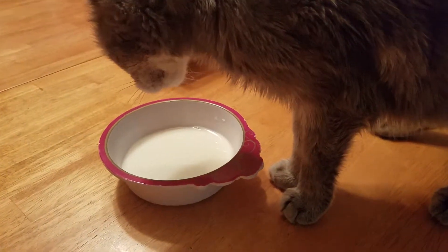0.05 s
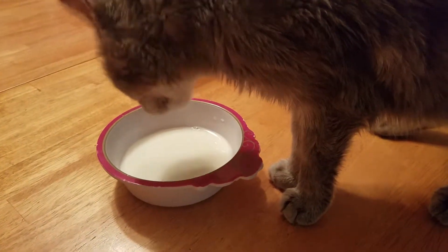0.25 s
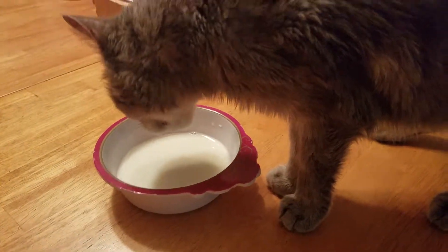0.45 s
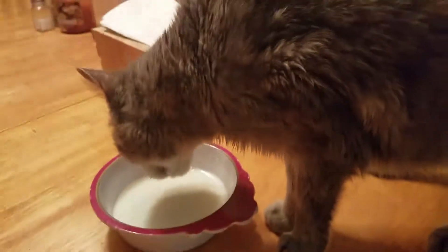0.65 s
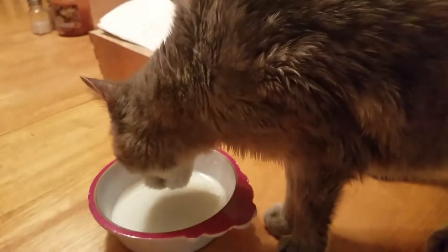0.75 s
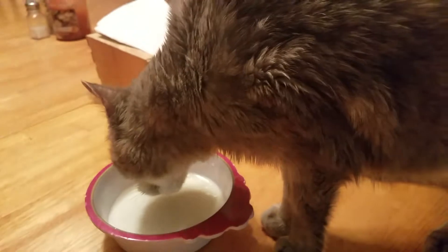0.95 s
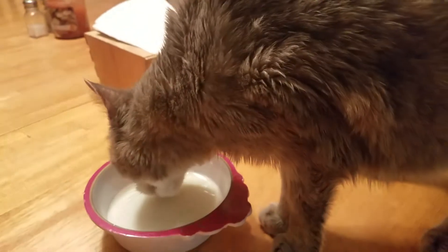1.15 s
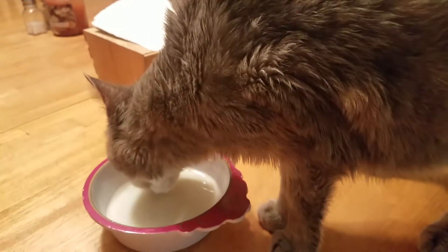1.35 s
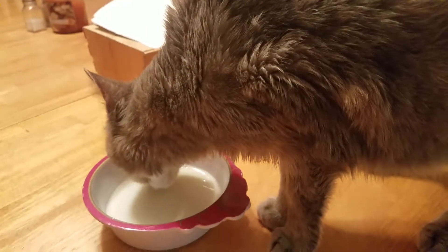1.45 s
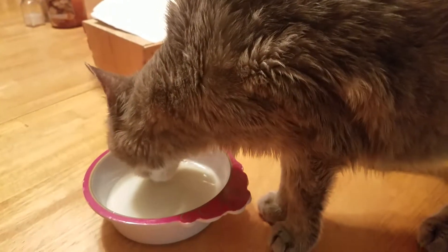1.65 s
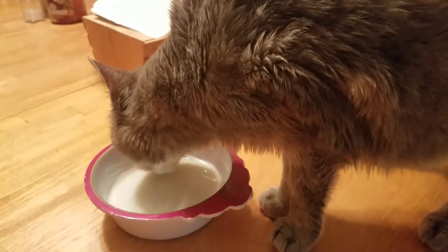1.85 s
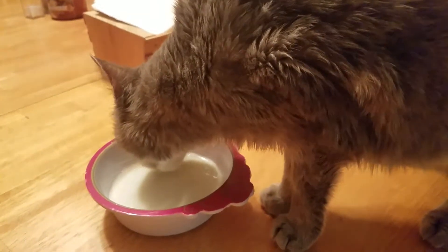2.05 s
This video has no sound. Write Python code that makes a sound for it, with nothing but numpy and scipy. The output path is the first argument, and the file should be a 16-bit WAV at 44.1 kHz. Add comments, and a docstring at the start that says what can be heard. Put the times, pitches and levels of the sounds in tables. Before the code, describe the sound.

Soft, wet lapping of a cat drinking milk, after a few dull microphone bumps.

```python
"""A cat laps milk from a bowl in a quiet room: soft, wet tongue smacks that ring briefly in its mouth,
a few tiny ticks, and one short snuffle as air flutters through its nose. Mostly before the lapping,
the hand holding the recorder shifts, sending dull bumps and a little rubbing to the left microphone.
Underneath lies a bed of steady room tone, a faint ringing whir and microphone hiss."""
import sys
import numpy as np
from scipy import signal
from scipy.fft import rfft, irfft
from scipy.io import wavfile
from scipy.ndimage import uniform_filter1d

SR = 44100
rng = np.random.default_rng(int(sys.argv[2]) if len(sys.argv) > 2 else 0)


def unload_audio(sound):
    """Save the sound as a 16-bit wav file, at the path given as the first command line argument."""
    columns = np.transpose(np.atleast_2d(sound))
    # keep every value between -1 and 1, then stretch to whole-number steps
    steps = np.round(np.clip(columns, -1, 1) * 32767)
    wavfile.write(sys.argv[1], SR, steps.astype(np.int16))


N = 92610
TIME = np.arange(N) / SR


def from_db(db):
    """Decibels to gain."""
    return 10 ** (np.asarray(db) / 20)


def unit_rms(x):
    """Scale to unit power."""
    return x / np.sqrt(np.mean(x ** 2) + 1e-20)


def fader(rows):
    """A gain curve from rows of t/s, level/dB."""
    return from_db(np.interp(TIME, *np.transpose(rows)))


def pan(db):
    """Left and right gains: positive dB leans left, and the louder side stays at 1."""
    return from_db([[min(db, 0)], [min(-db, 0)]])


def butter(x, hz, kind, order):
    """Causal low- or high-pass."""
    sos = signal.butter(order, np.clip(hz, 10, .45 * SR), kind, fs=SR, output="sos")
    return signal.sosfilt(sos, x + 1e-18)


def resonance(x, hz, width_hz):
    """A band-pass of gain 1 at its centre."""
    return signal.lfilter(*signal.iirpeak(hz, hz / width_hz, fs=SR), x + 1e-18)


def ring(x, hz, t60):
    """A resonator: a unit click sets off a dying sine of height 1."""
    r, w = from_db(-60 / (t60 * SR)), 2 * np.pi * hz / SR
    return signal.lfilter([0, np.sin(w)], [1, -2 * r * np.cos(w), r * r], x + 1e-18)


def noise(colour):
    """Unit-power noise, coloured by rows of f/Hz, level/dB."""
    hz, db = np.transpose(colour)
    bins = np.maximum(np.fft.rfftfreq(N, 1 / SR), 1)
    eq = from_db(np.interp(np.log(bins), np.log(hz), db))
    return unit_rms(irfft(rfft(rng.standard_normal(N)) * eq, N))


def click(s):
    """A unit impulse at s seconds."""
    return 1. * (np.arange(N) == int(s * SR))


def burst(s, decay_s):
    """An envelope with a half-millisecond attack and an exponential decay."""
    decay = (TIME >= s) * np.exp(-np.abs(TIME - s) / decay_s)
    return uniform_filter1d(decay, size=24)


def room_tone():
    """Steady, low room noise, unrelated in the two channels."""
    # room spectrum: f/Hz, left level/dB, right level/dB
    colour = [(20.3, -11.5, -28), (53.6, 4, -9), (90, 0, -8.5), (173, -0.5, -10), (289, -8, -7.5),
              (390, -6.5, -30), (430, -17, -8.5), (600, -14.5, -27), (666, -23.5, -23), (774, -15, -17),
              (1037, -19, -27), (1400, -18.5, -26.5), (1565, -16, -27), (2010, -23, -34), (2590, -18, -30),
              (3440, -31, -37), (4100, -33.5, -41.5), (5900, -41.5, -45), (16000, -52, -56)]
    left = from_db(-52.5) * noise(np.array(colour)[:, [0, 1]])
    right = from_db(-55.5) * noise(np.array(colour)[:, [0, 2]])
    return np.array([left, right])


def hiss():
    """Each microphone adds its own airy hiss."""
    # hiss spectrum: f/Hz, level/dB
    colour = [(1000, -13), (8500, -11.5), (11000, -3), (15000, 4), (16000, 1.5)]
    return from_db(-72.5) * np.array([noise(colour) for _ in range(2)])


def whir():
    """Noise rings in narrow resonances on the left, under a wavering treble sheen."""
    # resonances: f/Hz, width/Hz, level/dB
    modes = [(1693, 92, -9), (2447, 17, 0), (2788, 23, 0), (2970, 116, 5), (3145, 50, -2.5),
             (3368, 22.6, 3.5), (3670, 360, -27.5)]
    # swell of the ringing: t/s, level/dB
    swell = [(0, -71.5), (.3, -68), (.55, -66), (1.4, -61), (2.1, -62.5)]
    # wavering of the sheen: t/s, level/dB
    sheen_swell = [(0, -88), (.4, -87), (.55, -65), (.8, -68.5), (1.05, -65), (1.2, -68.5), (1.35, -64),
                   (1.48, -61.5), (1.6, -70.5), (2.1, -75)]
    # sheen spectrum: f/Hz, level/dB
    sheen_colour = [(1000, -49), (2500, -16), (3500, 3), (4300, -6), (4700, -15.5), (5600, -19),
                    (6500, -41), (16000, -49)]
    ringing = sum(from_db(db) * unit_rms(resonance(rng.standard_normal((2, N)), hz, width))
                  for hz, width, db in modes)
    ringing = unit_rms(butter(ringing, 4640, "low", order=6))
    return (fader(swell) * ringing + fader(sheen_swell) * noise(sheen_colour)) * pan(42)


def hand_bumps():
    """Soft and hard contacts of the hand thud through the case and leave it ringing low."""
    # contacts: t/s, strength/dB, brightness/Hz
    bumps = [(0.2154, -19.5, 162), (0.2773, -9.5, 1574), (0.2850, -10, 99), (0.328, -12, 142),
             (0.3768, -10, 95), (0.4268, -15.5, 212), (0.4435, -9.5, 153), (0.4534, -15, 1740),
             (0.4813, -20, 160), (0.4926, -21, 1400), (0.5065, -29.5, 190), (0.5308, -27, 600),
             (0.5448, -22, 560), (0.5588, -27, 216), (0.63, -33.5, 110), (0.9895, -31, 1400),
             (1.0179, -34.5, 600), (1.024, -34, 59.5), (1.066, -40, 108), (1.283, -39, 90),
             (1.6171, -37.5, 1480)]
    # case resonances: f/Hz, width/Hz, level/dB
    modes = [(50.6, 16.3, 23.5), (75.7, 15, 13.5), (178, 95, 4), (460, 63, -5.5)]
    case_hz, case_q, top_hz = 121, 1.74, 404
    force = sum(from_db(db) * butter(click(s), hz, "low", order=5) for s, db, hz in bumps)
    dulled = signal.lfilter([1], [1, -np.exp(-2 * np.pi * top_hz / SR)], force)   # boosts the lows
    w = 2 * np.pi * case_hz
    highpass = signal.bilinear([1, 0, 0], [1, w / case_q, w * w], SR)
    thud = signal.lfilter(*highpass, dulled)
    return thud + sum(from_db(db) * resonance(thud, hz, width) for hz, width, db in modes)


def hand_rub():
    """Skin rubs over the case with a low rumble and slips in small clicks."""
    # skin slips: t/s, level/dB, brightness/Hz
    slips = [(0.2692, -40, 1900), (0.3805, -33.5, 3200), (0.4340, -34, 2000), (0.4371, -39, 2760),
             (0.4550, -26, 2520), (0.4636, -35, 2570), (0.468, -40, 1800), (0.4850, -31.5, 1800),
             (0.4928, -37, 1830), (0.5125, -38, 1880), (0.5372, -29.5, 3620), (0.5545, -37, 4500),
             (1.017, -38, 3200), (1.6160, -37, 2250)]
    # swell of the rubbing: t/s, level/dB
    swell = [(0, -79), (.19, -48.5), (.3, -46), (.41, -42), (.46, -36.5), (.55, -35.5), (.58, -47),
             (.7, -57.5), (.96, -56), (1.03, -43), (1.11, -61.5), (2.1, -61.5)]
    # rubbing spectrum: f/Hz, level/dB
    colour = [(20, -12), (55, 14.5), (150, -3), (400, -6), (1000, -22), (2500, -29.5), (4500, -40),
              (6000, -53.5), (16000, -48)]
    clicks = sum(from_db(db) * SR / (2 * hz) * butter(click(s), hz, "low", order=6)
                 for s, db, hz in slips)
    clicks = butter(clicks, 4400, "low", order=8)
    return fader(swell) * noise(colour) - butter(clicks, 360, "high", order=1)


def echoes(x, t60_s=0.16, wet_db=-6):
    """A short diffuse tail from the floor and walls."""
    tail = rng.standard_normal((2, N)) * from_db(-60 * TIME / t60_s) * (TIME > .003)
    tail /= np.sqrt(np.sum(tail ** 2, axis=1, keepdims=True))
    return from_db(wet_db) * signal.fftconvolve(x, tail, axes=1)[:, :N]


def ticks():
    """Tiny bursts of bright noise tick to the right."""
    # ticks: t/s, level/dB, pan/dB
    hits = [(0.3795, -46, -14), (0.8370, -53.5, -8), (0.8650, -55, -10), (1.0050, -59, -2),
            (1.5310, -61, -6), (1.6260, -61, -6), (1.6755, -55, -6), (1.8035, -57, -15)]
    # tick spectrum: f/Hz, level/dB
    colour = [(3000, -36), (8000, -21), (11000, 5), (15000, 9.5)]
    envelope = sum(from_db(db) * pan(side_db) * burst(s, decay_s=0.001) for s, db, side_db in hits)
    return noise(colour) * envelope


def snuffle():
    """Air flutters through the cat's nose at purring rate and sounds hollow in the bowl."""
    # nose puffs: t/s at the peak, level/dB
    puffs = [(1.302, -62.5), (1.337, -57), (1.372, -59), (1.408, -58), (1.442, -58), (1.476, -55.5),
             (1.528, -64)]
    # puff spectrum: f/Hz, level/dB
    puff_colour = [(800, 1), (1800, -1), (3200, -2), (4200, 6.5), (5800, -17), (8200, -4), (9300, -6.5),
                   (10700, -2), (12200, -9), (14000, 2), (16000, 1)]
    # swell of the breath in the bowl: t/s, level/dB
    bowl_swell = [(0, -84), (1.2, -66), (1.3, -56), (1.4, -58), (1.47, -50.5), (1.53, -58), (1.65, -62),
                  (2.1, -89)]
    # its hollow spectrum: f/Hz, level/dB
    bowl_colour = [(100, -14), (260, -2), (360, 6), (460, -2.5), (620, -14.5), (1100, -14.5), (1900, -13),
                   (2600, -28), (5000, -32), (16000, -54.5)]
    puff_width_s = 0.0084
    flutter = sum(from_db(db) * np.exp(-.5 * ((TIME - s) / puff_width_s) ** 2) for s, db in puffs)
    hollow = np.array([noise(bowl_colour) for _ in range(2)])
    return flutter * noise(puff_colour) * pan(-30) + fader(bowl_swell) * hollow


def laps():
    """Each soft tongue smack rings briefly in the mouth, with a wet snap that is duller on the left."""
    # tongue smacks: t/s, level/dB, mouth pitch/Hz, pan/dB
    smacks = [(0.8950, -42.5, 1340, 1), (0.8979, -46, 1660, 9), (1.355, -45.5, 1480, 15),
              (1.4330, -47, 1400, 1), (1.442, -50, 1930, 6), (1.478, -46, 1260, -7),
              (1.5215, -43.5, 1580, 8), (1.6160, -47, 1880, 17), (1.8006, -41.5, 1330, -11),
              (1.8026, -37.5, 1760, 22)]
    # spectrum of the wet snap: f/Hz, level/dB
    snap_colour = [(150, 8), (600, 1), (1400, -5), (2400, -15), (4300, -8), (6000, -32), (8200, -21),
                   (11000, -32), (16000, -28)]
    wet = np.array([butter(noise(snap_colour), 3200, "low", order=4), noise(snap_colour)])
    out = 0
    for s, db, hz, side_db in smacks:
        tongue = butter(click(s), 2500, "low", order=4)
        mouth = ring(tongue, hz, t60=0.013)
        snap = from_db(-4.5) * wet * burst(s, decay_s=0.0027)
        out = out + from_db(db) * pan(side_db) * (mouth + snap)
    return out


def scene():
    """The cat over the background bed, with handling noise hard left; only the laps echo."""
    lapping = laps()
    foreground = lapping + echoes(lapping) + ticks() + snuffle()
    handling = (hand_rub() - hand_bumps()) * pan(40)
    return foreground + handling + room_tone() + hiss() + whir()


def record(dry):
    """Trim the deepest rumble and cut the very top steeply."""
    top_cut = signal.ellip(10, .1, 70, 15900, fs=SR, output="sos")
    return signal.sosfilt(top_cut, butter(dry, 6.7, "high", order=1))


dry = scene()
out = record(dry)
unload_audio(out)
```